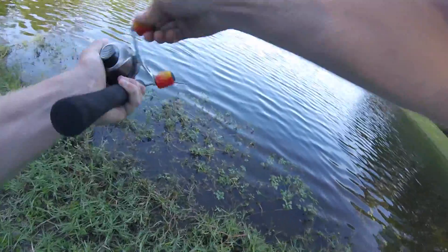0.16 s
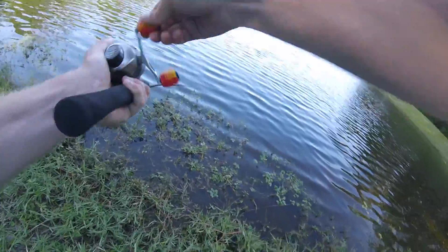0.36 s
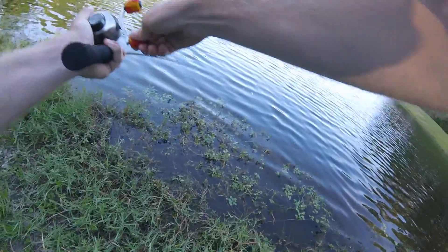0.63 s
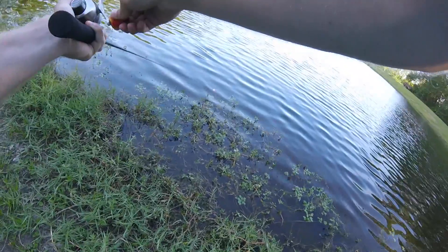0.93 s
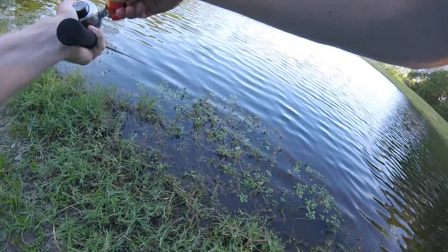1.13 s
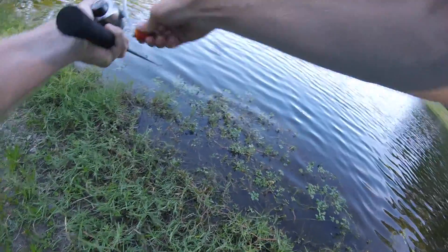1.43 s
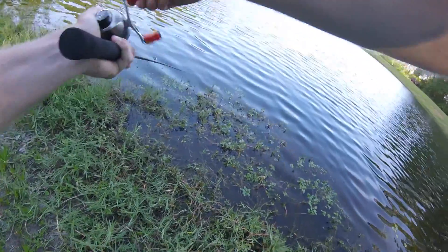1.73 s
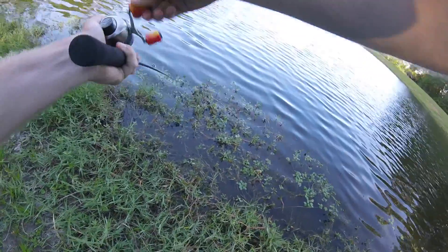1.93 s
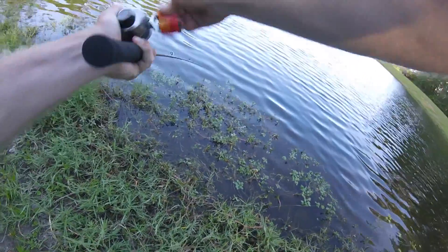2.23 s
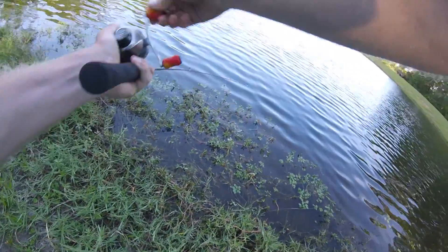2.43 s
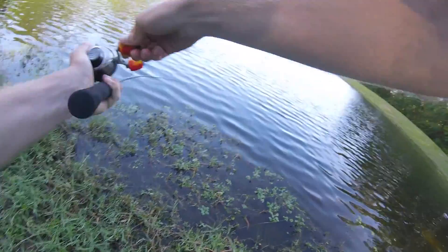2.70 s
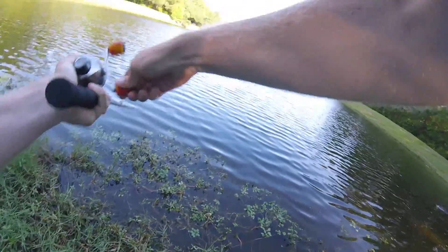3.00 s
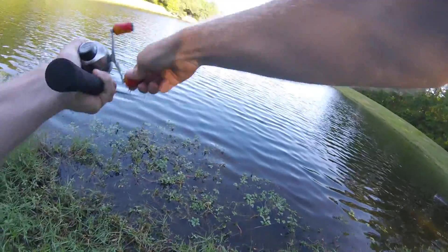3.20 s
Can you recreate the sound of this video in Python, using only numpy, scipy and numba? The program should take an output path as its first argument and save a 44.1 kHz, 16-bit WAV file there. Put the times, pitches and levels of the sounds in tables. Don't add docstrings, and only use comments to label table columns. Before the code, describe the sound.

A fishing reel's ratchet buzzes in fast surges, pauses, restarts in shorter turns, then fades to single clicks; dull handling knocks and low wind rumble surround it, outdoors, close to a muffled body-worn camera.

```python
import sys
import numpy as np
from scipy import signal
from scipy.io import wavfile
from scipy.ndimage import uniform_filter1d, minimum_filter1d
from numba import njit

SR = 44100
rng = np.random.default_rng(int(sys.argv[2]) if len(sys.argv) > 2 else 0)


def boost(x):
    u = np.asarray(x, float) / 20
    return 10 ** u


def digitize_waveform(pressure):
    field = np.atleast_2d(pressure).T
    bounded = np.clip(field, -1, 1)
    quanta = np.round(bounded * 32767).astype(np.int16)
    wavfile.write(sys.argv[1], SR, quanta)


N = 147735
T = np.arange(N) / SR

# start_s, teeth_per_s, snap_db
EARLY_SURGES = [
    [(0.0022, 242.8, -24), (0.0486, 112.3, -29), (0.1076, 182.5, -26), (0.185, 77.8, -31)],
    [(0.1931, 180.1, -26), (0.2697, 132.9, -24), (0.2808, 236.6, -24), (0.3802, 186.2, -26),
     (0.394, 239.6, -24), (0.418, 177.5, -24)],
    [(0.424, 173.6, -25), (0.4965, 262.9, -26), (0.5459, 186.1, -27), (0.5725, 264.4, -27),
     (0.6147, 211.1, -31), (0.666, 64.8, -27)],
    [(1.0562, 50.1, -32), (1.1163, 116.0, -29), (1.158, 124.1, -33), (1.1993, 214.4, -29),
     (1.2257, 160.0, -31), (1.2911, 57.8, -32)],
    [(1.5273, 35.5, -32), (1.5594, 88.7, -30), (1.5838, 76.3, -32)],
]
LATE_SURGES = [
    [(1.6605, 30.5, -35), (1.7252, 149.9, -31), (1.744, 81.7, -32), (1.7536, 128.9, -31),
     (1.7734, 170.6, -27), (1.8262, 56.7, -34)],
    [(1.8385, 79.9, -34), (1.9013, 206.9, -28), (1.92, 106.9, -28), (1.9721, 162.9, -26),
     (2.0169, 152.1, -32), (2.0649, 54.3, -34)],
    [(2.0773, 82.5, -37), (2.0985, 93.4, -31), (2.2002, 223.8, -29), (2.2427, 149.0, -29),
     (2.2971, 111.4, -30)],
    [(2.3056, 166.6, -32), (2.3311, 225.4, -24), (2.3784, 112.7, -31), (2.4155, 209.6, -32),
     (2.4464, 237.2, -30), (2.4946, 101.5, -32)],
    [(2.5068, 87.9, -31), (2.5417, 198.9, -30), (2.5879, 143.7, -28), (2.6131, 102.5, -25),
     (2.6603, 149.0, -30), (2.7117, 85.2, -33), (2.7802, 33.3, -33), (2.8395, 95.7, -38)],
]
# start_s, snap_db
CREEP_TEETH = [
    (1.0264, -44),
    (1.3318, -40),
    (1.4214, -34.5),
    (1.4953, -34.5),
    (1.621, -40.5),
    (2.914, -47),
    (3.152, -52),
    (3.332, -40),
]
# mode_hz, level_db, t60_s
COVER_MODES = [(1550, -5, 0.0019), (2185, -14, 0.0075), (3180, -15.5, 0.02), (4805, -15.5, 0.011),
               (6120, 0.5, 0.012), (6550, -3.5, 0.017), (6950, -1, 0.0065), (7730, -14, 0.0052),
               (8660, -14.5, 0.0053), (9470, -19.5, 0.0056), (10970, -16, 0.0089)]
# start_s, high_over_low_ring_db, rim_db
HAND_GRIP = [(0, -2.5, 5), (.19, -0.5, 0), (.25, 0, 1), (.4, -2, 3.5), (.52, -2, 8.5), (.62, 4.5, -3.5),
             (1.2, 5.5, 3), (1.55, 3, -11), (1.95, 6.5, -5), (2.05, 6, -1.5), (2.45, 3.5, 3),
             (2.6, 4.5, -3), (2.8, 0.5, 4)]
# centre_hz, width_hz, level_db
RUB_BANDS = [(1600, 310, -5), (3166, 2000, -1.5), (5265, 1140, -2), (6500, 3600, 1), (9600, 3800, -3.5)]
# start_s, length_s, load_db
LINE_DRAG = [
    (0.236, 0.15, 5),
    (0.452, 0.13, 8),
]
# band_hz, level_db_per_hz
AIR_SPECTRUM = [(60, -5), (160, 0.5), (350, -9), (900, -19), (1300, -31), (4500, -53), (9000, -38.5),
                (12500, -60.5)]
# centre_hz, width_hz, level_db
PORT_BANDS = [(1700, 820, -54), (3210, 2900, -61), (5200, 1700, -65), (9560, 5400, -70), (6640, 1300, -63)]
# time_s, level_db
WIND_LEVEL = [
    (.15, -35.5),
    (.5, -36),
    (.7, -42.5),
    (1.15, -49.5),
    (1.5, -33.5),
    (1.65, -40.5),
    (1.95, -35.5),
    (2.3, -38.5),
    (3.0, -43),
]
# time_s, level_db
ARM_RUSTLE = [
    (0, 5.5),
    (.55, 7.5),
    (.65, -8),
    (1.3, -10),
    (1.42, 2.5),
    (1.5, 4),
    (2.75, -3.5),
    (2.95, -2),
]
# start_s, level_db, pitch_hz
DRY_TICKS = [(1.394, -46, 4500), (1.429, -34, 4220), (1.547, -46, 2000), (1.64, -44, 5000),
             (2.939, -42, 1800), (2.943, -43, 3030), (2.977, -38, 1700), (3.011, -41, 1900),
             (3.049, -43, 3000), (3.082, -37, 1650), (3.091, -39, 2200), (3.119, -40, 2100),
             (3.141, -47, 2200), (3.195, -41, 6500), (3.222, -40, 4800), (3.25, -35.5, 1700),
             (3.313, -42.5, 1900), (3.323, -36.5, 2200), (3.342, -39, 1800)]
# start_s, peak_db, boom_db, treble_db_per_octave, top_mode_db
MOUNT_KNOCKS = [(0.166, -22.5, -5, -13, 4), (0.171, -13.5, -6.5, -2, 2.5), (0.356, -23, -8, -9, 0),
                (0.366, -17.5, 1, 5, -5), (0.433, -20.5, 6, -4, 2), (0.581, -22.5, -9, -20, -19),
                (0.587, -15, -2.5, -5, 9.5), (0.712, -32, 9.5, 9.5, -3), (0.725, -32.5, -27, 3.5, 9),
                (1.26, -25, -40, -3.5, 0), (1.759, -21.5, 0, -4, 6.5), (1.763, -10.5, 2, -5, 3),
                (1.963, -25.5, -33, -3, -9), (1.974, -21, -7, -4.5, 1), (2.185, -24, 0, -12, 14.5),
                (2.207, -25, 3, -8, 2), (2.415, -17.5, 3, -3.5, -1), (2.619, -22.5, 2, -6, -9),
                (2.633, -18.5, 1, -1.5, -5), (2.6367, -14, 9.5, -4, 4.5), (2.872, -28, -21, -2, -3),
                (2.882, -21, 0.5, -7, -4), (3.022, -29.5, 6, -5, 4), (3.227, -24, 1, -16, -5),
                (3.248, -28.5, 2, -7, 7.5)]
# mode_hz, level_db, rise_s
HOUSING_MODES = [(146.2, -1.5, 0.0054), (340.7, -1, 0.0023), (498, -21.5, 0.0052), (605, -10.5, 0.0043),
                 (786, -12.5, 0.0022), (1046, -22, 0.0018)]
# start_s, length_s, from_hz, to_hz, level_db
CLEAR_NOTES = [(0.846, 0.037, 3030, 1310, -59), (1.326, 0.0191, 2600, 2800, -54),
               (1.365, 0.01928, 3400, 2981, -51), (1.386, 0.02, 2950, 2614, -56),
               (1.405, 0.039, 1650, 1490, -49.5), (1.46, 0.018, 2750, 2530, -59),
               (1.513, 0.022, 1550, 1660, -48), (1.612, 0.0089, 1600, 1600, -39),
               (1.63, 0.01, 1700, 1600, -49), (2.495, 0.013, 1600, 1470, -41.5),
               (2.88, .03, 3400, 3350, -63), (3.211, 0.015, 2100, 1670, -44.5)]
# start_s, length_s, from_hz, to_hz, level_db
BUZZY_NOTES = [
    (.838, .028, 3600, 3200, -56),
    (1.062, .025, 3400, 3200, -56),
    (1.29, .03, 3500, 3300, -57),
]
# start_s, length_s, high_db, low_db
INSECT_CHIRPS = [(1.455, .025, -75, -62), (2.495, .012, -70, -55), (2.93, .018, -58, -62),
                 (2.948, .032, -57, -75), (3.046, .015, -58, -59), (3.056, .042, -58, -75),
                 (3.067, .035, -75, -57), (3.11, .018, -63, -59), (3.13, .058, -72, -59),
                 (3.285, .025, -59, -70), (3.331, .03, -62, -58)]

SNAP_DB, SNAP_S, JITTER_S = -1.5, .0003, .03 / 150
BOUNCE_S, BOUNCE_DB, BOUNCE_SPREAD_DB = 0.0072, -14, 2.1
SCATTER_DB, COLOUR_DB, DRIFT_DB = 2, 2, 1.6
SLOW_BRIGHT_DB, FAST_BODY_DB = 10, 1
RUB_DB, RUB_POWER, RUB_GATE, RUB_GATE_S = -51.5, 1.18, .6, .002
AIR_DB, RUSTLE_FLICKER_DB, WIND_HZ = -38, 2, 5.8
TICK_CYCLES, CRACKLE_PER_S, CRACKLE_DB = 18, 51, -59
KNOCK_DB, SAG = -1, 0.2
BUZZ_HZ, INSECT_HZ = 260, (7060, 3970)


@njit
def svf(x, hz, width):
    y, b, l = np.empty(len(x)), 0., 0.
    g, k = np.tan(np.pi * hz / SR), width / hz
    for i in range(len(x)):
        v = (b + g * (x[i] - l)) / (1 + g * (g + k))
        b, l, y[i] = 2 * v - b, l + 2 * g * v, k * v
    return y


def ring(x, hz, t60):
    pole = np.exp((2j * np.pi * hz - np.log(1000) / t60) / SR)
    return signal.lfilter([1], [1, -pole], x + 0j).imag


def unit(x):
    return x / np.sqrt(np.mean(x ** 2))


def hiss(hz, width):
    once = svf(rng.standard_normal(N), 1. * hz, 1. * width)
    return unit(svf(once, 1. * hz, 1. * width))


def walk(rate_hz):
    k = int(SR / rate_hz)
    steps = np.repeat(rng.standard_normal(N // k + 1), k)
    return 1.3 * uniform_filter1d(uniform_filter1d(steps, k), k)[:N]


def bump(start_s, length_s):
    return np.sin(np.pi * np.clip((T - start_s) / length_s, 0, 1)) ** 2


def rustle_db(t):
    return np.interp(t, *np.array(ARM_RUSTLE).T)


def crank():
    teeth, speed = list(CREEP_TEETH), np.zeros(N)
    for surge in list(EARLY_SURGES) + list(LATE_SURGES):
        s, rate, db = np.array(surge).T
        t = T[(T >= s[0]) & (T < s[-1] + .002)]
        speed += np.interp(T, s, rate, 0, 0)
        angle = np.cumsum(np.interp(t, s, rate)) / SR
        at = np.interp(np.arange(int(angle[-1]) + 1), angle, t)
        teeth += zip(at, np.interp(at, s, db))
    bridged = -minimum_filter1d(-speed, size=700)
    return np.array(teeth).T, uniform_filter1d(bridged, size=500)


def pawl(at, db, speed):
    chance = rng.standard_normal((len(at), len(COVER_MODES) + 3))
    turn = rng.random((len(at), len(COVER_MODES)))
    at = at + JITTER_S * chance[:, 0] - .0005
    grip_s, tilt_col, rim_col = np.array(HAND_GRIP).T
    tilt, rim = np.interp(at, grip_s, tilt_col), np.interp(at, grip_s, rim_col)
    octaves = np.log2(np.interp(at, T, speed).clip(75) / 150)
    first = (at.clip(0) * SR).astype(int)
    rebound = ((at + BOUNCE_S) * SR).astype(int)
    rebound_gain = boost(BOUNCE_DB + BOUNCE_SPREAD_DB * chance[:, 2])
    u = np.arange(-80, 81) / SR
    out = 0
    for k, (hz, mode_db, t60) in enumerate(COVER_MODES):
        lean = np.clip((hz - 6550) / 350, -1, 1) * (5000 < hz < 8000)
        level_db = db + SNAP_DB + mode_db + SCATTER_DB * chance[:, 1] + COLOUR_DB * chance[:, 3 + k]
        level_db = level_db + tilt * lean + rim * (hz > 10000)
        level_db = level_db - SLOW_BRIGHT_DB * octaves * (8000 < hz < 10000)
        level_db = level_db + FAST_BODY_DB * octaves * (3000 < hz < 3400 or hz > 10000)
        level_db = level_db + DRIFT_DB * (1 if lean else 1.2) * np.interp(at, T, walk(12))
        size = boost(level_db) * np.exp(2j * np.pi * turn[:, k])
        hits = np.zeros(N + SR, complex)
        np.add.at(hits, first, size)
        np.add.at(hits, rebound, size * rebound_gain)
        soft = np.exp(-.5 * (u / SNAP_S * (1.6 if hz > 7300 else 1)) ** 2)
        snap = soft / soft.sum() * np.exp(2j * np.pi * hz * u)
        out = out + ring(signal.fftconvolve(hits[:N], snap, "same"), hz, t60)
    return out


def gears(at, speed):
    at = np.sort(at)
    last = np.searchsorted(at - .001, T).clip(1) - 1
    since = T - at[last] + .001
    puff = 1 - RUB_GATE + 2.5 * RUB_GATE * np.exp(-np.abs(since) / RUB_GATE_S)
    rub = sum(boost(db + 2.2 * walk(14)) * hiss(hz, w) for hz, w, db in RUB_BANDS)
    load_db = sum(db * bump(s, length) for s, length, db in LINE_DRAG)
    return rub * puff * boost(RUB_DB + load_db) * (speed / 150) ** RUB_POWER


def outdoor_air():
    spectrum_hz, spectrum_db = np.array(AIR_SPECTRUM).T
    out, swell, rustle = 0, walk(4.16), rustle_db(T)
    for hz in 60 * 2 ** np.arange(0, 7.8, .5):
        db = np.interp(np.log(hz), np.log(spectrum_hz), spectrum_db) + 10 * np.log10(hz)
        db = db + 0.5 * swell + 0.26 * (300 < hz < 2500) * rustle + 3.23 * walk(12)
        out = out + boost(db) * hiss(hz, hz / 2)
    return unit(out) * boost(AIR_DB)


def port_rustle():
    out, rustle = 0, rustle_db(T)
    for hz, width, db in PORT_BANDS:
        level_db = db + RUSTLE_FLICKER_DB * walk(9.25) + (not 6000 < hz < 7500) * rustle
        out = out + boost(level_db) * hiss(hz, width)
    return out


def wind():
    rumble = 2.17 * hiss(WIND_HZ, 12.5) + 1.04 * hiss(30.0, 60.5)
    return rumble * boost(np.interp(T, *np.array(WIND_LEVEL).T))


def ticks():
    luck = rng.random((int(CRACKLE_PER_S * N / SR), 3))
    at = luck[:, 0] * (N / SR - .02)
    db = CRACKLE_DB + 8 * luck[:, 1] + rustle_db(at)
    crackle = zip(at, db, 1450 * 4 ** luck[:, 2] ** 2)
    out, u = np.zeros(N + 800), np.arange(800) / SR
    for s, tick_db, hz in list(DRY_TICKS) + list(crackle):
        i = int(s * SR)
        decay = np.exp(-np.log(1000) * u * hz / TICK_CYCLES)
        out[i:i + len(u)] += boost(tick_db) * decay * np.sin(2 * np.pi * hz * u)
    return out[:N]


def knocks():
    out, u = np.zeros(N), np.arange(4000) / SR
    chance = rng.standard_normal((len(MOUNT_KNOCKS), len(HOUSING_MODES)))
    for (s, db, boom_db, treble_db, top_db), luck in zip(MOUNT_KNOCKS, chance):
        i = int((s - 0.0003) * SR)
        for k, (hz, mode_db, rise) in enumerate(HOUSING_MODES):
            share_db = boom_db
            if k:
                share_db = treble_db * np.log2(hz / HOUSING_MODES[1][0]) + top_db * (hz > 700)
            mode_hz = hz * (1 + 0.025 * (k > 0) * luck[-k])
            cycles = mode_hz * (u + SAG * rise * (1 - np.exp(-u / rise)))
            swell = (u / rise * np.exp(1 - u / rise)) ** 1.03
            gain = (-1) ** k * boost(db + KNOCK_DB + mode_db + share_db + 1.2 * luck[k])
            out[i:i + len(u)] += gain * swell * np.sin(2 * np.pi * cycles)
    return out


def glide(start_s, length_s, from_hz, to_hz, db):
    level = boost(db + 5.4 * walk(150)) * bump(start_s, length_s) ** 0.054
    hz = np.interp(T, [start_s, start_s + length_s], [from_hz, to_hz]) * (1 + 0.0117 * walk(200))
    return level * np.sin(2 * np.pi * np.cumsum(hz) / SR)


def birds_and_squeaks():
    chop = 2 * np.sin(np.pi * BUZZ_HZ * T) ** 6
    return sum(glide(*row) for row in CLEAR_NOTES) + chop * sum(glide(*row) for row in BUZZY_NOTES)


def insect():
    high, low = (boost(2.5 * walk(60)) * np.sin(2 * np.pi * hz * T + walk(40)) for hz in INSECT_HZ)
    out = 0
    for s, length, high_db, low_db in INSECT_CHIRPS:
        out = out + (boost(high_db) * high + boost(low_db) * low) * bump(s, length) ** 0.071
    return out


def scene():
    (at, db), speed = crank()
    reel = pawl(at, db, speed) + gears(at, speed)
    mount = knocks()
    weather = outdoor_air() + port_rustle() + wind()
    wildlife = insect() + birds_and_squeaks()
    return (reel + mount + weather + wildlife + ticks())[None]


def roll_off(x):
    return signal.sosfilt(signal.butter(12, 12360, fs=SR, output="sos"), x)


def record(dry):
    housed = dry - 0.49 * svf(dry[0], 1308.0, 350.0)
    low_pass = signal.butter(4, 12800, fs=SR, output="sos")
    mix = signal.sosfilt(low_pass, housed)
    return roll_off(mix)


dry = scene()
out = record(dry)
digitize_waveform(out)
```